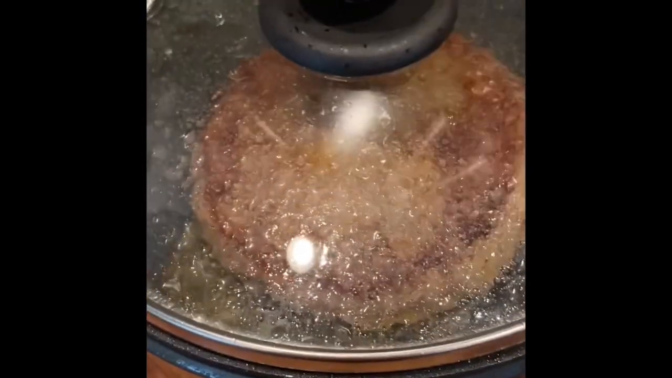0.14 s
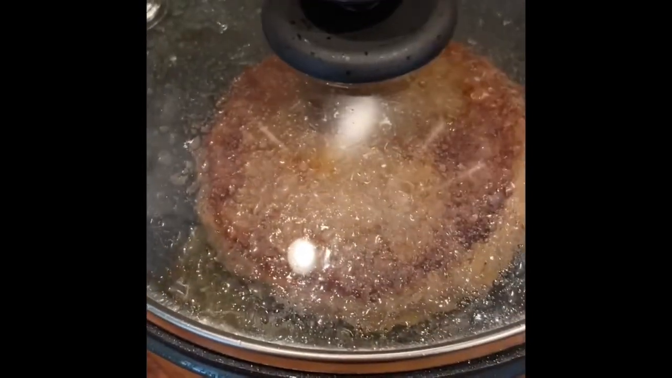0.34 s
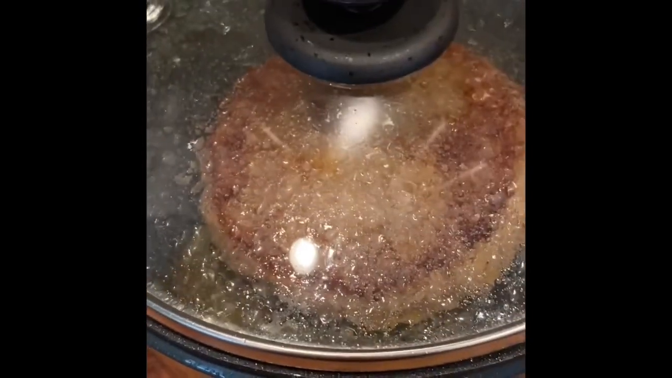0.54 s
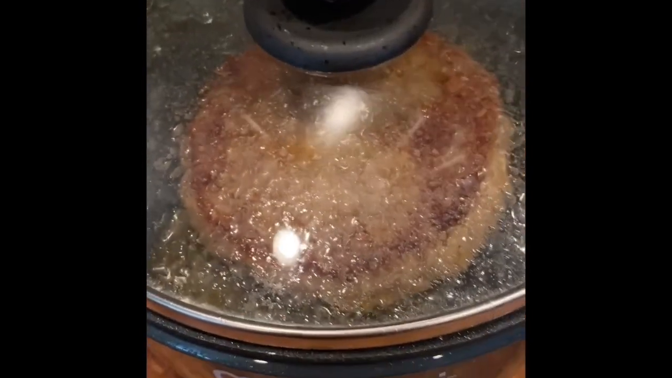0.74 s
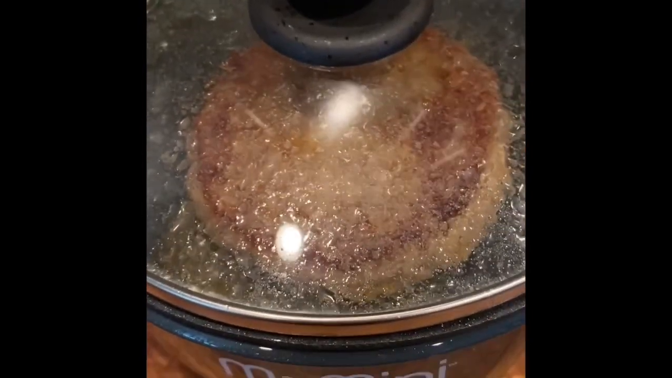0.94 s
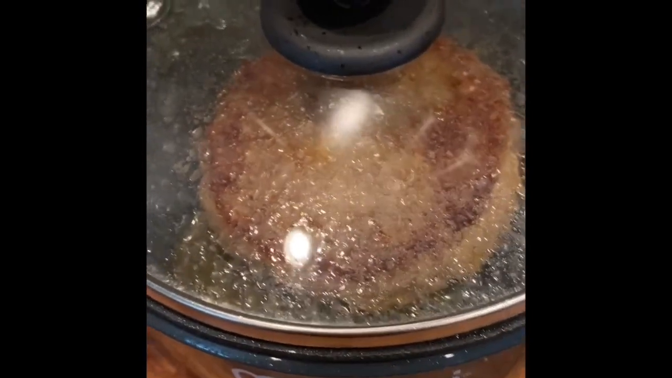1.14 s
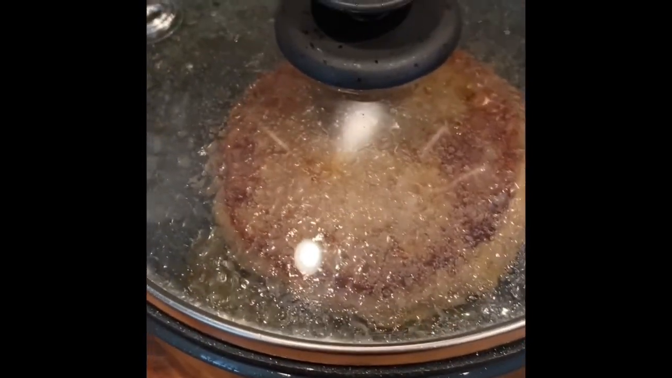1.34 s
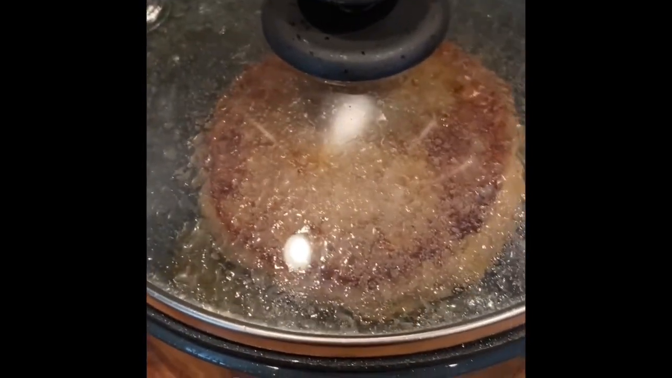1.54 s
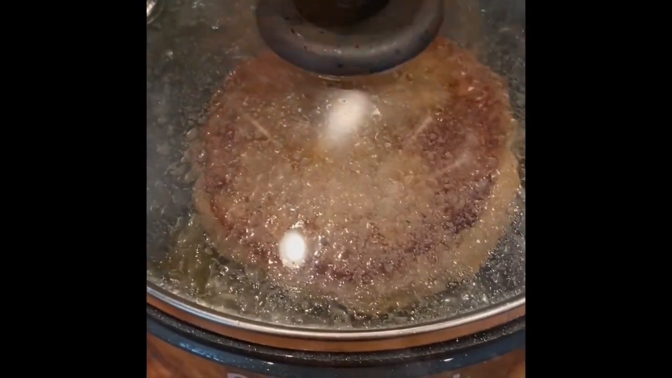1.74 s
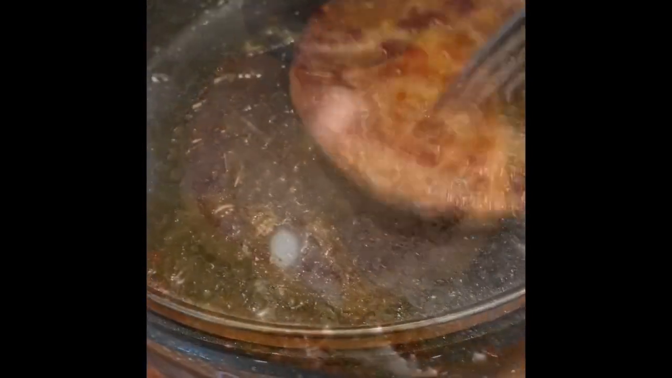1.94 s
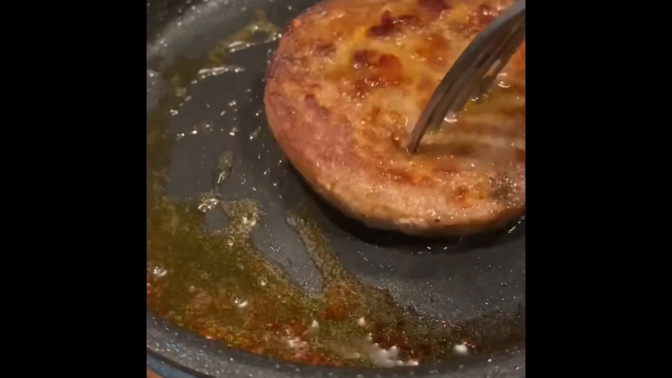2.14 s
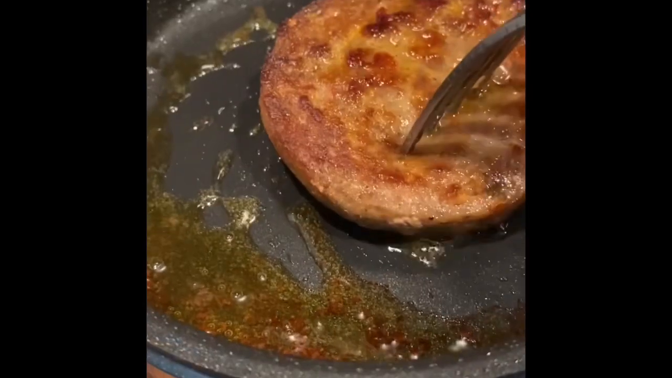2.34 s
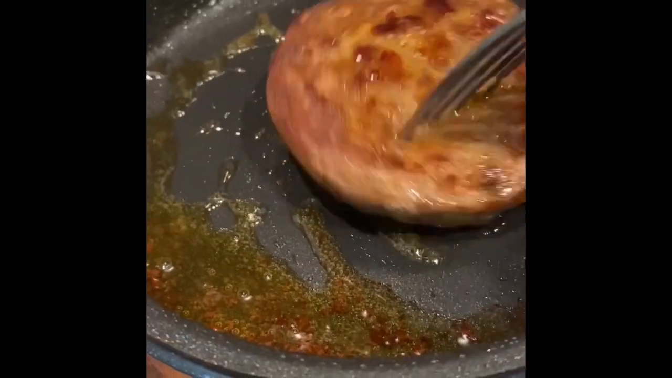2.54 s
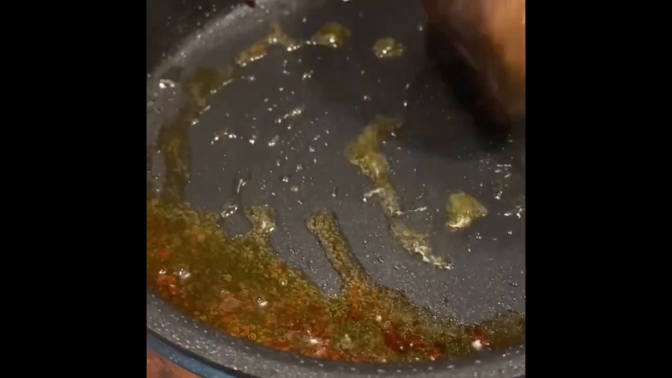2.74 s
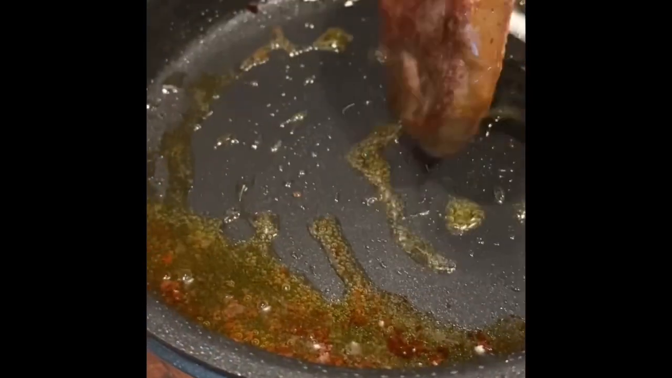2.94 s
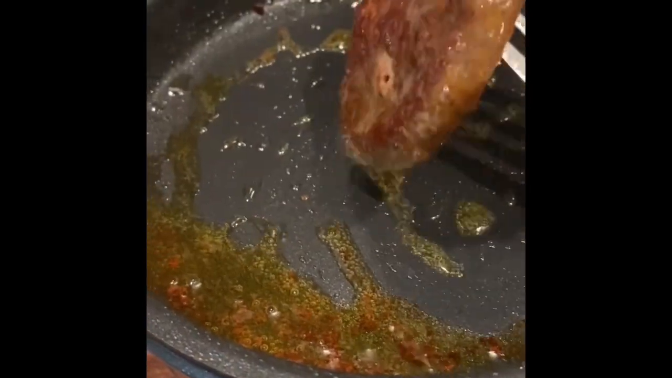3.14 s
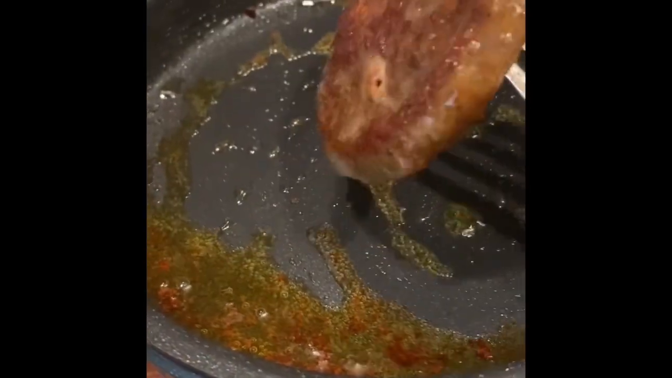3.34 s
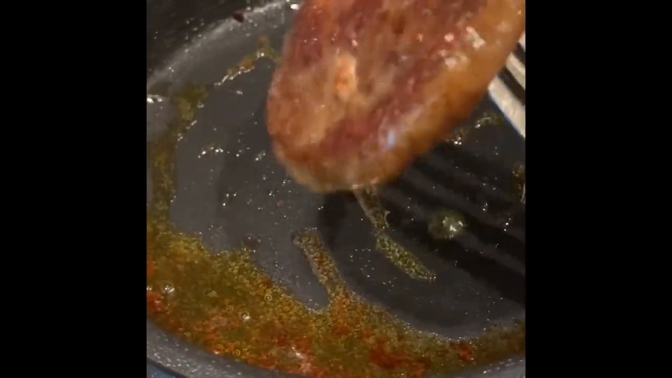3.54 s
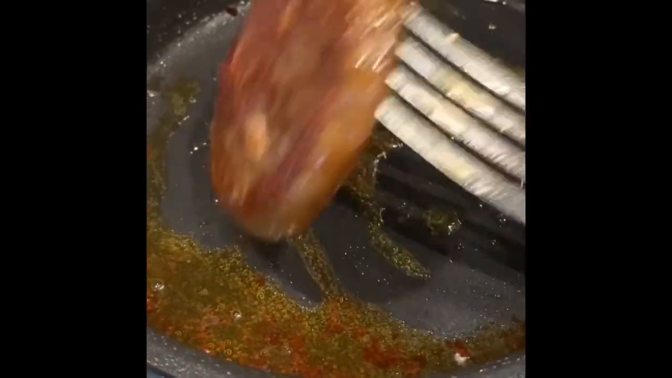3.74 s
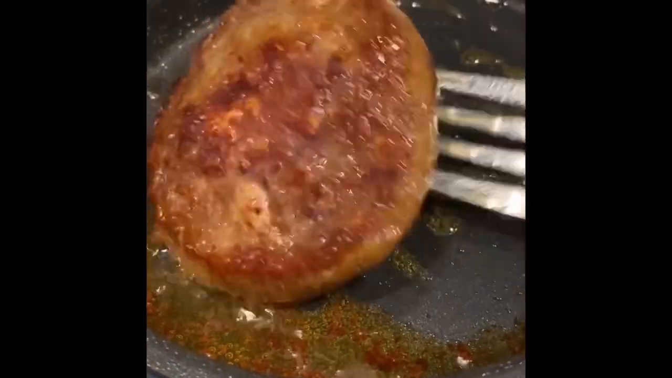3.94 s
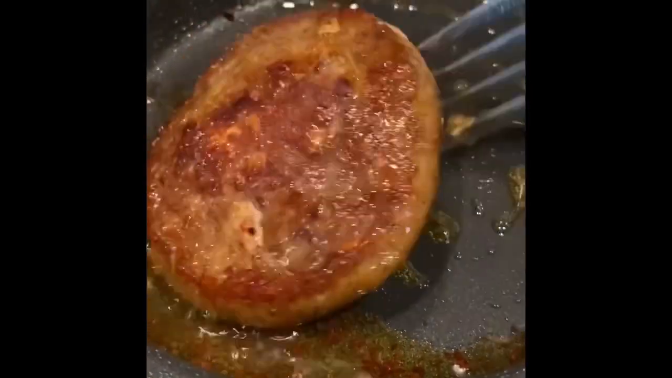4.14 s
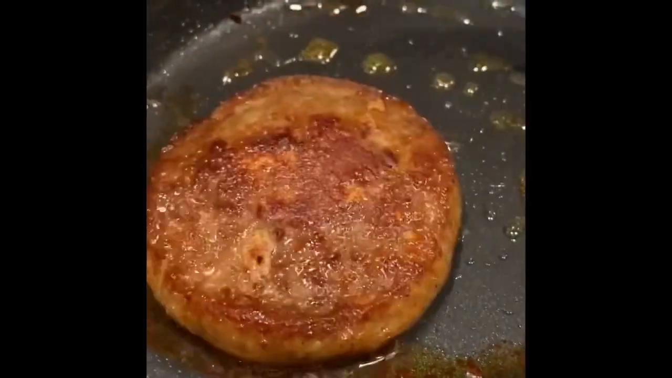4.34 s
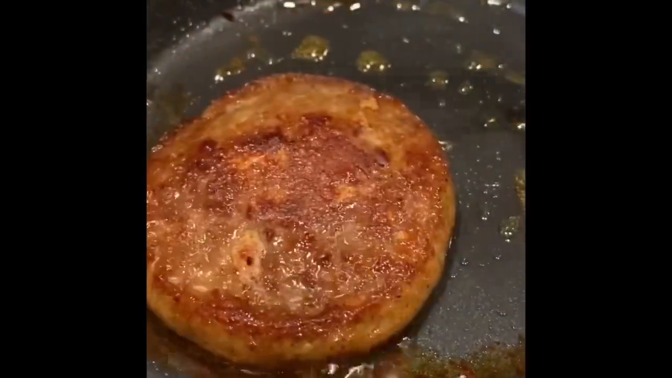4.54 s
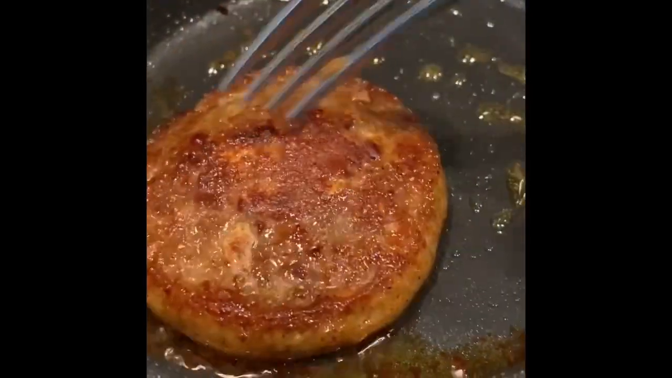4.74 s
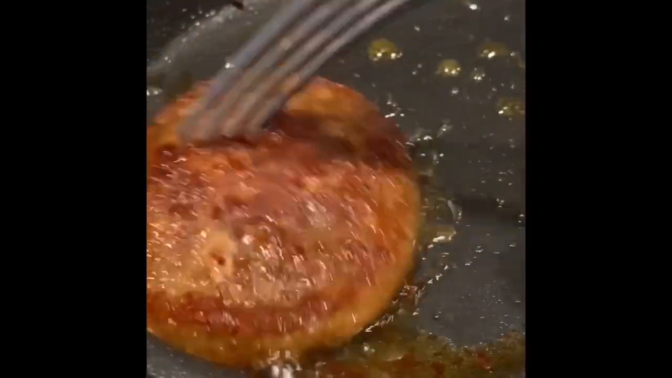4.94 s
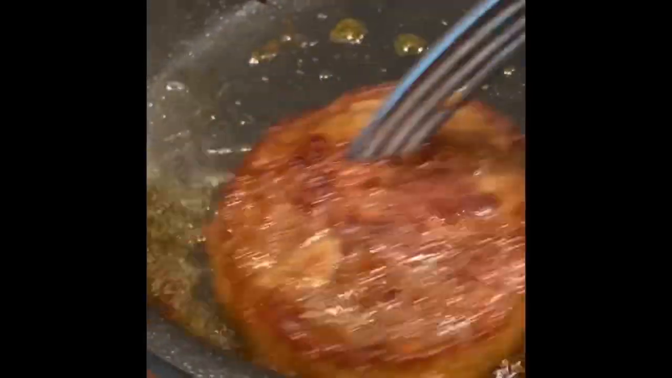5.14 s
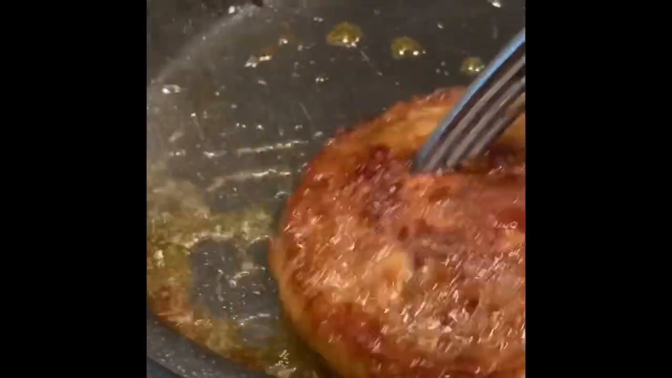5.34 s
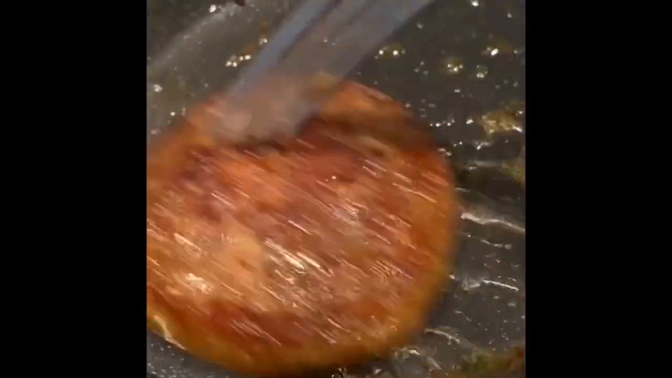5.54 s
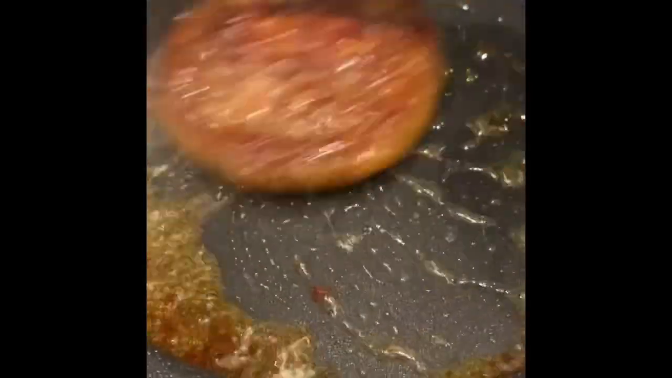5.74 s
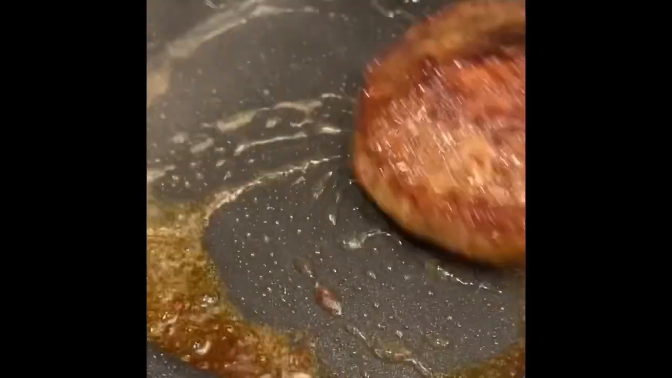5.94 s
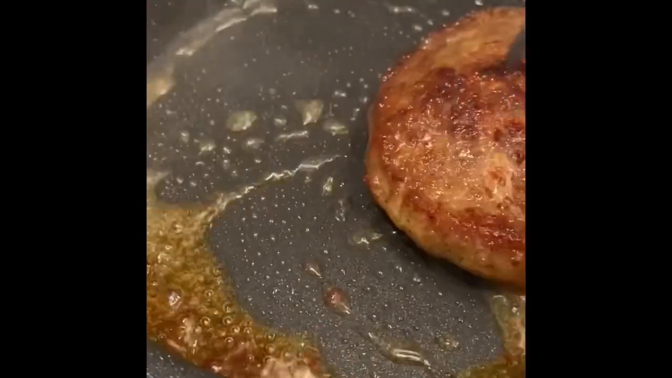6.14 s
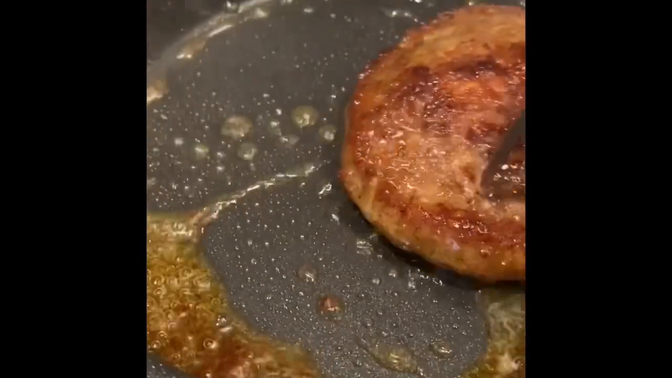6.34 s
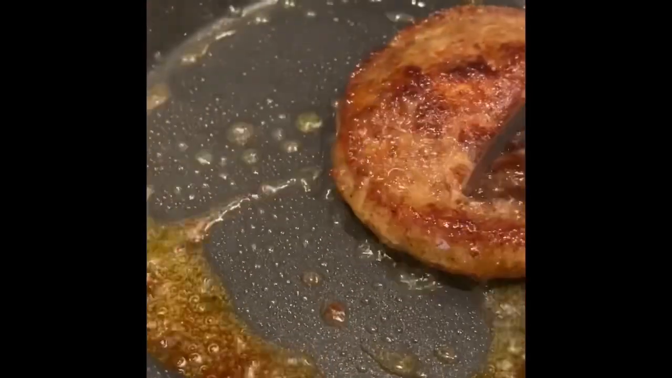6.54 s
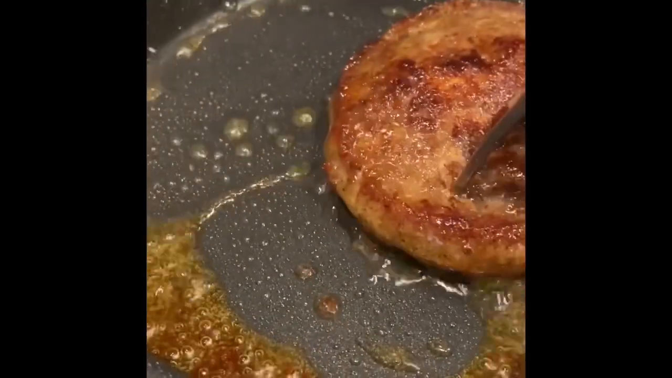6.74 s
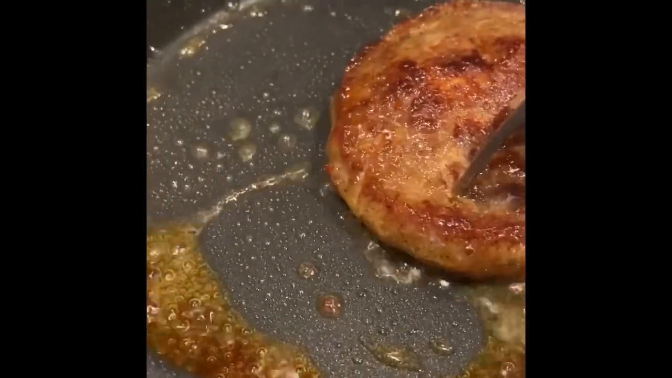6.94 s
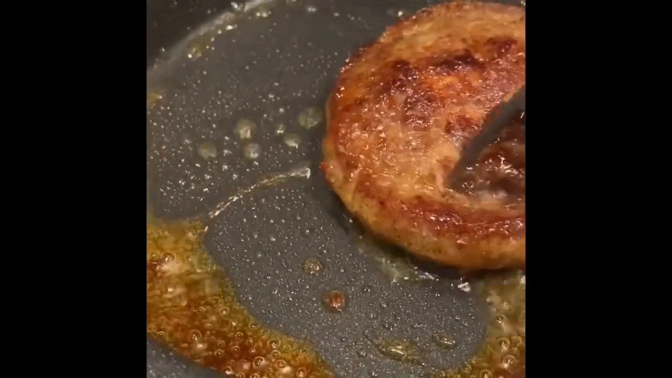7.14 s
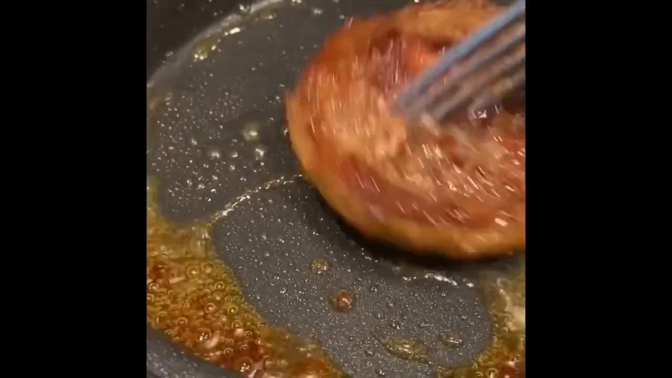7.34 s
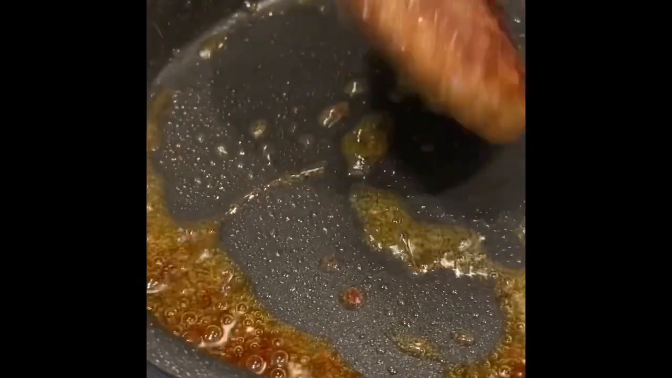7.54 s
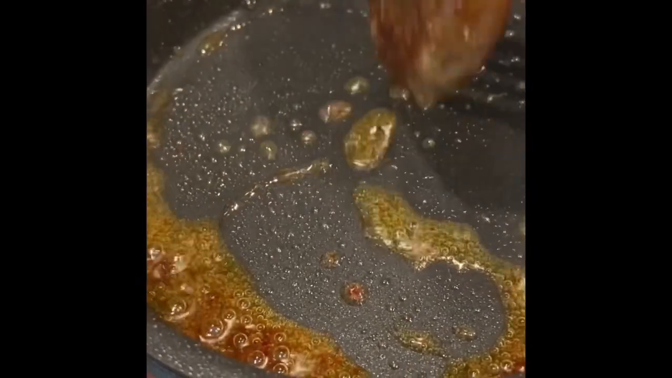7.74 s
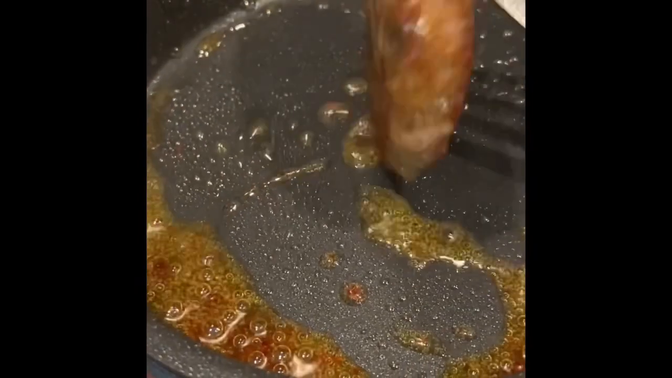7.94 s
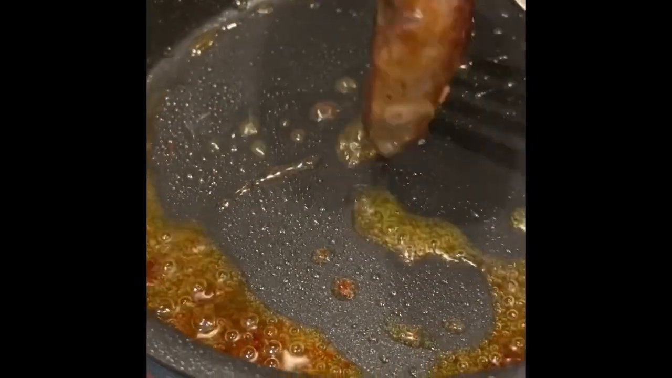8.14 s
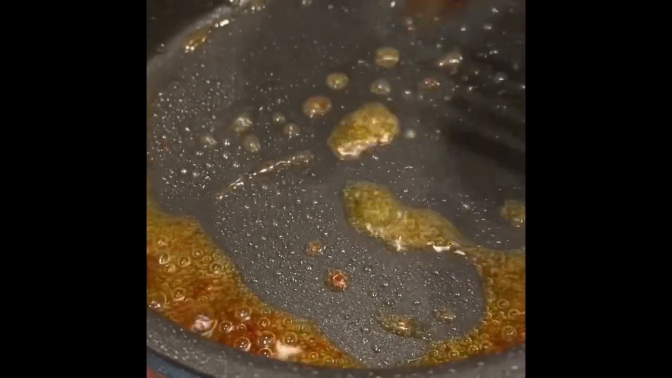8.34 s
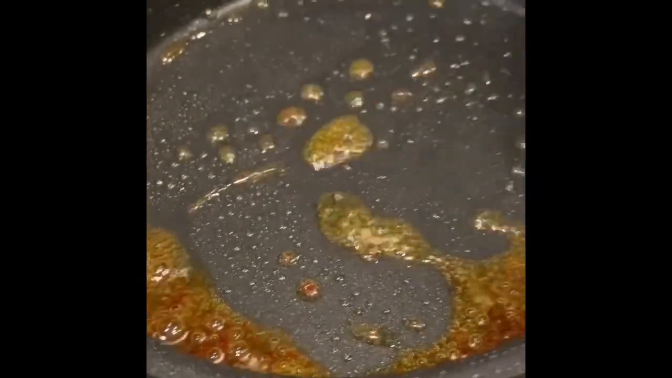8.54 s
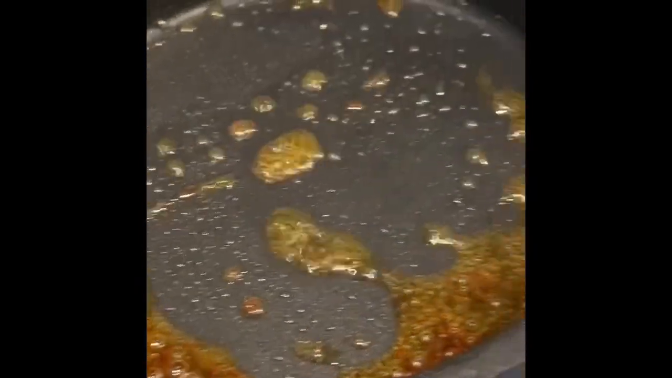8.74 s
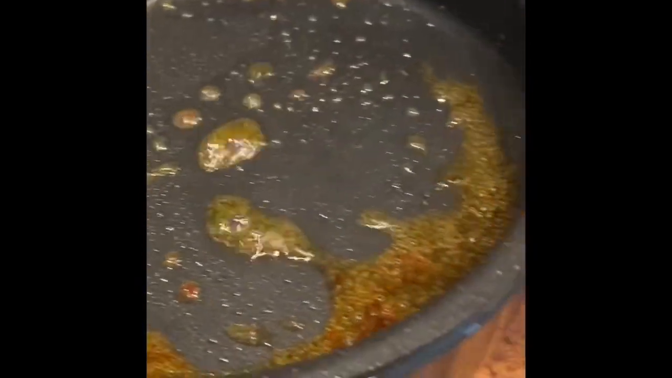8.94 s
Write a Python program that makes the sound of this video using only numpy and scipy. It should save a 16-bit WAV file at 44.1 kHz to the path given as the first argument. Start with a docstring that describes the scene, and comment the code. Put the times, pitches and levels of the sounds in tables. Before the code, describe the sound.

Hot fat simmers with a thin, enclosed ring under a lid, with a few small ticks. Uncovered, it becomes crisp, wide and spitting. Metal tines clack and briefly chatter on the pan as the patty is flipped, followed by dense hissing swells that fade to separate snaps. Close stereo microphone, short indoor room, faint mains hum and dull air noise.

```python
"""A meat patty sizzles in a small electric skillet, heard from close above: steam bursts as fizz and crackle.
Larger bubbles pop: each snaps, rings its cavity and throws a spray of noise.
A glass lid makes the sizzle faint and hollow with its ringing air, then lifts away.
A fork knocks and scrapes the pan as it drags and flips the patty; the sizzle swells and slowly calms.
Behind it lie mains hum, a faint whine, a low drone and dull room noise."""
import sys
import numpy as np
from scipy import signal
from scipy.fft import rfft, irfft, next_fast_len
from scipy.io import wavfile
from scipy.ndimage import map_coordinates

SR = 44100
rng = np.random.default_rng(int(sys.argv[2]) if len(sys.argv) > 2 else 0)


def generate_wav(signal):
    """Clip the signal to [-1, 1] and save it as 16-bit WAV at the path in sys.argv[1]."""
    frames = np.transpose(np.atleast_2d(signal))
    scaled = np.clip(frames, -1, 1) * 32767
    pcm = np.round(scaled).astype(np.int16)
    wavfile.write(sys.argv[1], SR, pcm)


N = 401310  # length in samples


def amp(db):
    """Decibels to gain."""
    return 10 ** (np.asarray(db) / 20)


def unit(x):
    """Scale to rms 1."""
    return x / np.sqrt(np.mean(x ** 2) + 1e-20)


def unit_rows(x):
    """Scale each row to energy 1."""
    return x / np.linalg.norm(x, axis=1, keepdims=True)


def along(points, hz):
    """Read a curve of (pitch_hz, value) points on a log pitch axis."""
    f, v = np.transpose(points)
    return np.interp(np.log(hz + 1), np.log(f + 1), v)


def curves(rows):
    """One value per sample for each column after the time."""
    s, *cols = np.transpose(rows)
    return [np.interp(np.arange(N) / SR, s, c) for c in cols]


def wobble(rate):
    """A smooth random curve with this many knots a second."""
    knots = rng.standard_normal(int(N * rate / SR) + 4)
    return map_coordinates(knots, [np.arange(N) * rate / SR])


def filtered(x, response):
    """Multiply the spectrum of x by a response that depends on frequency."""
    m = next_fast_len(N + SR // 2)
    return irfft(rfft(x, m) * response(np.fft.rfftfreq(m, 1 / SR)), m)[..., :N]


def coloured(x, spectrum):
    """Shape x with a (pitch_hz, level_db) curve, at rms 1."""
    return unit(filtered(x, lambda hz: amp(along(spectrum, hz))))


def resonances(modes, f):
    """Response at the frequencies f of (pitch_hz, width_hz, level_db) resonances."""
    return sum(amp(db) * 1j * f * w / (c * c - f * f + 1j * f * w) for c, w, db in modes)


def placed(times, waves):
    """Sum short waves (one a row) at their times."""
    at = np.round(np.asarray(times) * SR).astype(int)[:, None] + np.arange(waves.shape[1])
    return np.bincount(np.clip(at, 0, N).ravel(), waves.ravel(), N + 1)[:N]


def bursts(rate, spread_db):
    """Random impulses of both signs and uneven size, this many a second on average, at rms 1."""
    size = amp(spread_db * np.minimum(rng.standard_normal(N), 1.5))
    happens = rng.random(N) < rate / SR
    return unit(happens * size * rng.choice([-1, 1], N))


def rings(hz, cycles, size=256):
    """Short rings of unit energy, one a row: each swells and dies within a few cycles."""
    turns = np.asarray(hz)[:, None] * np.arange(size) / SR
    age = turns / np.reshape(cycles, (-1, 1))
    return unit_rows(age * np.exp(-age) * np.sin(2 * np.pi * turns))


def swell(start, rise, hold, fall_db_per_s):
    """Gain that rises, holds and dies away."""
    age = np.arange(N) / SR - start
    return np.clip(age / rise, 0, 1) * amp(-fall_db_per_s * np.maximum(age - rise - hold, 0))


# the lid lifts: start_s, open_share (0-1 of the pan)
LID_OPENING = [(1.73, 0.28), (1.8, 0.43), (1.97, 1.0)]


def open_share():
    """Share of the pan that the lid leaves open, at every sample."""
    return curves(LID_OPENING)[0]


def shut_gain():
    """Gain of what is heard through the lid: it fades as the lid opens."""
    return np.sqrt(np.clip(1 - open_share(), 0, 1))


# mains hum over time: start_s, base_level_db (rms), octave_level_db (rms)
HUM_LEVELS = [(0, -70, -56.5), (1.6, -66, -57), (1.97, -62, -63), (2.3, -59, -55), (4.0, -53.5, -56),
              (4.9, -57, -57.5), (5.9, -59.5, -62.5), (7.3, -65.5, -63.5), (8.4, -68, -60)]
HUM_HZ = 59.8
# faint steady appliance whine: pitch_hz, level_db (rms)
WHINE_TONES = [(242.2, -75), (355.3, -71.5), (387.6, -72)]
DRONE_HZ, DRONE_DB = 71.3, -63  # low tone, rms dB with the lid shut; it fades as the lid lifts


def appliance_tones():
    """Mains hum with its octave, a low drone and a whine: plain tones that drift slightly."""
    t = np.arange(N) / SR
    base_db, octave_db = curves(HUM_LEVELS)
    phase = 2 * np.pi * np.cumsum(HUM_HZ + .15 * wobble(1.98)) / SR
    hum = amp(base_db) * np.sin(phase) + amp(octave_db) * np.sin(2 * phase)
    whine = sum(amp(db) * np.sin(2 * np.pi * hz * t + wobble(5)) for hz, db in WHINE_TONES)
    drone = amp(DRONE_DB) * shut_gain() * np.sin(2 * np.pi * DRONE_HZ * t + .5 * wobble(3))
    return np.sqrt(2) * (hum + whine + drone)  # peak level from rms level


# colour of the low room rumble: pitch_hz, relative_level_db
RUMBLE_COLOUR = [(20, -42), (36, -11), (50, 9), (72, 10), (95, 4), (140, -39)]
# colour of the dull kitchen air: pitch_hz, relative_level_db
AIR_COLOUR = [(60, -15), (130, -3), (180, -2.5), (300, -3), (400, -7.5), (600, -13.5), (1000, -18),
              (1300, -14.5), (5000, -52)]
RUMBLE_DB, AIR_DB = -68.5, -61.5  # levels at the average hum
RUMBLE_SWELLS, AIR_SWELLS = 1.2, 0.74  # dB by which each swells per dB of hum
AIR_SIDE_DB = -16  # sideways part of the air, against its centre


def room_noise():
    """Soft noise, low and dull, that swells and sinks together with the hum."""
    base_db, octave_db = curves(HUM_LEVELS)
    hum_db = 20 * np.log10(np.hypot(amp(base_db), amp(octave_db)))
    swing_db = hum_db - hum_db.mean()
    rumble = amp(RUMBLE_DB) * coloured(rng.standard_normal(N), RUMBLE_COLOUR)
    # both rows share one rms
    centre, sides = amp(AIR_DB) * coloured(rng.standard_normal((2, N)), AIR_COLOUR)
    air = centre + amp(AIR_SIDE_DB) * np.array([sides, -sides])
    return amp(RUMBLE_SWELLS * swing_db) * rumble + amp(AIR_SWELLS * swing_db) * air


# how long the room rings: pitch_hz, t60_s (time to fall 60 dB)
ROOM_DECAY = [(150, 0.11), (1500, 0.084), (6000, 0.09), (15000, 0.023)]


def room(x):
    """Two short tails of fading noise: one from ahead, one from the sides."""
    hz, t, z = signal.stft(rng.standard_normal((2, SR // 3)), SR, nperseg=256)
    fade = amp(-60 * t / along(ROOM_DECAY, hz)[:, None])
    tail = signal.istft(z * fade, SR, nperseg=256)[1]
    return signal.fftconvolve(x[None], tail / np.linalg.norm(tail[0]), axes=1)[:, :N]


def smeared(x, life):
    """Smear x with four brief fading noises whose mix keeps shifting, so it loosens from the plain sound."""
    t = np.arange(SR // 50) / SR
    smears = unit_rows(rng.standard_normal((4, len(t))) * np.exp(-t / life) * (t > .0005))
    copies = signal.fftconvolve(x[None], smears, axes=1)[:, :N]
    weights = np.array([wobble(60) for _ in copies])
    return np.sum(copies * weights, axis=0) / np.linalg.norm(weights, axis=0)


def struck(modes, t):
    """One blow rings (pitch_hz, level_db, t60_s) modes at slightly random strengths, with peak 1 or less."""
    ring = 0
    for hz, db, t60 in modes:
        fading = amp(db + rng.normal(0, 1) - 60 * t / t60)
        ring = ring + fading * np.sin(2 * np.pi * (hz * t + rng.random()))
    return ring * (1 - np.exp(-t / 0.00029)) / np.abs(ring).max()


# fork and patty knock the pan: start_s, pan_ring_db, clack_db (before CLACK_GAIN_DB), crack_db, thud_db,
# pitch_ratio (at that spot; a higher one also shortens the ring)
KNOCK_TIMES = [(2.945, -23, -40, -43, -62, 1.02), (2.99, -33, -57, -62, -65, 1.02),
               (3.033, -40, -64, -68, -70, 1.03), (3.747, -34, -30, -23, -40, 1.0),
               (3.7505, -31, -35, -25, -55, 1), (3.8205, -33, -34, -22, -42, 0.91),
               (4.238, -31.5, -41, -38, -52, 1.0), (4.247, -55, -52, -50, -31, 1.0),
               (8.225, -53, -59, -55, -43, 0.97)]
# tones of the struck pan: pitch_hz, relative_level_db, t60_s (at pitch ratio 1)
PAN_TONES = [(390, -23, 0.12), (630, 0.5, 0.046), (755, 3, 0.07), (910, -7, 0.034), (990, -6, 0.041),
             (1155, -5.5, 0.027), (1340, -9, 0.038), (1570, -25, .05), (2090, -8, 0.06), (2326, -11, 0.04)]
# tones of the fork against the pan: pitch_hz, relative_level_db, t60_s (at pitch ratio 1)
TINE_TONES = [(412, -8, 0.1), (720, -6, 0.05), (1320, -4, 0.024), (1630, -1, 0.026), (2150, -1, 0.024),
              (2360, -6, .018), (2690, -1, 0.018)]
# colour of the crunching crust: pitch_hz, relative_level_db
CRACK_COLOUR = [(150, -22), (400, -7), (700, 0), (1000, -5), (1500, 0), (2200, 0), (3000, -7), (5000, -7),
                (9000, -17), (16000, -30)]
CLACK_GAIN_DB = 5.0
CRACK_T60_S, THUD_T60_S, THUD_HZ = 0.023, 0.095, 85


def knocks():
    """Each knock rings the pan, with a clack from the tines, a crunch from the crust and a thud from the meat."""
    t = np.arange(SR // 4) / SR
    s, ring_db, clack_db, crack_db, thud_db, pitch = np.transpose(KNOCK_TIMES)
    blows = []
    for pan_db, tine_db, p in zip(ring_db, clack_db + CLACK_GAIN_DB, pitch):
        blows.append(amp(pan_db) * struck(PAN_TONES, p * t) + amp(tine_db) * struck(TINE_TONES, p * t))
    blows = np.array(blows)
    grit = coloured(rng.standard_normal(N), CRACK_COLOUR)[:blows.size].reshape(blows.shape)
    cracks = amp(crack_db)[:, None] * grit * amp(-60 * t / CRACK_T60_S)
    thud = np.sin(2 * np.pi * THUD_HZ * t) * amp(-60 * t / THUD_T60_S) * (1 - np.exp(-t / .004))
    return placed(s, blows + cracks + amp(thud_db)[:, None] * thud)


# the fork chatters over the pan floor: start_s, hold_s, floor_ring_db, tine_ring_db, pitch_ratio
SCRAPE_STROKES = [(2.941, .004, -44, -36, .98), (2.959, 0.031, -43, -46, 1.02), (3.904, .008, -54, -39, 1),
                  (3.917, .01, -43, -48, 1.01), (3.97, 0.011, -44, -46, 1.02),
                  (3.989, .028, -37, -38.5, 1.04), (4.028, 0.018, -41, -43, .97),
                  (4.053, .011, -36, -36, 1), (4.062, 0.0054, -29, -42, 0.99)]
# what the rubbed pan floor rings: pitch_hz, width_hz, relative_level_db (all before squaring)
FLOOR_RINGS = [(400, 35, -7.5), (636, 55, 0), (757, 45, .8)]
# what the rubbed tines ring: pitch_hz, width_hz, relative_level_db (all before squaring)
TINE_RINGS = [(1015, 110, 1), (1147, 110, -2), (1360, 90, -9)]
SCRAPE_RISE_S, SCRAPE_FALL_DB_PER_S = 0.0045, 1100
SLIPS_PER_S, RUB_DB = 650, -5  # catches of the tines; smooth rubbing between them, against the slips
GRIP_DB, GRIP_PER_S = 1, 130  # uneven grip: size and knots a second
SCRAPE_WANDER = 0.02004  # how far the pitch ratio strays


def scrapes():
    """The sliding fork sticks and slips; slips ring floor and tines at a pitch that moves with the contact."""
    start, hold, floor_db, tine_db, pitch = np.transpose(SCRAPE_STROKES)
    slips = bursts(rate=SLIPS_PER_S, spread_db=3.0) + amp(RUB_DB) * rng.standard_normal(N)
    ratio = curves(np.column_stack([start, pitch]))[0] + SCRAPE_WANDER * wobble(40)
    slide = np.cumsum(ratio)  # reading faster raises the pitch
    strokes = np.array([swell(s, SCRAPE_RISE_S, h, SCRAPE_FALL_DB_PER_S) for s, h in zip(start, hold)])

    def rubbed(modes):
        ring = unit(filtered(slips, lambda f: resonances(modes, f) ** 2))
        return map_coordinates(ring, [slide])

    floor = amp(floor_db) @ strokes * rubbed(FLOOR_RINGS)
    tines = amp(tine_db) @ strokes * rubbed(TINE_RINGS)
    return amp(GRIP_DB * wobble(GRIP_PER_S)) * (floor + tines)


# the trapped air rings higher as it fills with steam: start_s, pitch_ratio
STEAM_PITCH = [(0, 0.972), (.4, 0.986), (.85, 1.012), (1.8, 1.03)]
# the air under the lid rings: pitch_hz, width_hz, relative_level_db (pitch and width before the steam shift)
LID_AIR_RINGS = [(552, 36, 6.5), (870, 210, 3.6), (1400, 120, -3), (2010, 180, 2.6), (3310, 280, 1),
                 (4880, 185, 3), (6080, 260, 2.5), (8600, 310, -7), (8900, 960, -4), (11200, 1500, -8)]
# colour of the sizzle that leaks past the lid: pitch_hz, relative_level_db
LEAK_COLOUR = [(300, -22), (1600, -15), (2700, 2), (4200, -5), (5500, -9), (7000, -39), (10000, -1),
               (13000, 8), (16000, 3)]


def covered():
    """Under the lid the sizzle is faint and hollow, coloured by the trapped air."""
    boiling = bursts(rate=5000, spread_db=6.0) + amp(-7.5) * bursts(rate=120, spread_db=9.0)
    hollow = unit(filtered(boiling, lambda f: resonances(LID_AIR_RINGS, f)))
    hollow = amp(-51.5) * map_coordinates(hollow, [np.cumsum(curves(STEAM_PITCH)[0])])
    leaking = bursts(rate=6600, spread_db=5.0) + amp(-10) * bursts(rate=150, spread_db=9)
    leak = amp(-53.0) * coloured(leaking, LEAK_COLOUR)
    return shut_gain() * amp(0.41 * wobble(13.1)) * (hollow + leak)


# the loudest bursting bubbles: start_s, pitch_hz (of the cavity), ring_db, snap_db, spray_db
# (levels before the three gains of pops)
LOUD_POPS = [(.106, 5940, -58, -59, -44), (.343, 4800, -54, -60, -57), (.451, 4840, -52, -63, -61),
             (.468, 4830, -44, -59, -52), (.557, 4870, -46.5, -62, -46), (.603, 3500, -52, -47, -44),
             (.672, 6000, -51, -62, -55), (.762, 3470, -54, -52, -52), (.816, 3420, -53, -49, -52),
             (1.144, 5000, -59, -51, -41), (1.163, 6220, -47, -60, -56), (1.173, 4910, -47, -57, -55.5),
             (1.188, 4970, -49, -56, -55), (1.337, 4890, -54, -54, -56), (1.351, 5320, -52, -54, -54),
             (1.866, 5210, -41, -47, -40), (1.891, 4990, -35, -44, -49), (1.935, 5000, -42, -48, -32),
             (1.981, 4090, -44, -47, -35), (2.105, 3960, -38, -41, -32), (2.12, 5400, -42, -46, -28),
             (2.144, 5200, -39, -44, -32), (2.177, 5320, -31, -41, -29), (2.211, 5660, -29, -32.5, -24),
             (2.236, 5260, -28, -40, -32), (2.259, 6060, -32, -45, -24), (2.295, 5230, -30, -41, -34),
             (2.321, 5210, -27, -33, -30), (2.394, 6200, -29, -45, -32), (2.464, 6310, -33, -41, -35),
             (2.493, 5230, -32, -44, -41), (2.511, 5470, -37, -47, -26.5), (2.551, 4110, -48, -34, -26),
             (2.585, 5120, -33, -42, -22), (2.601, 4870, -37, -42, -32), (2.633, 5530, -34, -49, -23),
             (2.655, 6120, -35, -49, -26), (2.695, 5540, -27.5, -55, -39), (2.794, 4800, -39, -43, -32),
             (2.824, 5640, -44, -43, -31), (2.866, 4300, -35, -33, -26), (2.906, 6160, -40, -48, -33),
             (2.924, 6900, -26, -40, -30), (2.944, 4780, -39, -36, -29), (2.973, 5460, -41, -36, -26.5),
             (3.018, 4950, -36, -35, -37), (3.024, 5040, -33, -54, -45), (3.06, 4480, -38, -41, -34),
             (3.072, 4200, -30, -47, -45), (3.091, 5630, -33, -33.5, -39), (3.157, 5000, -28, -32, -38),
             (3.162, 5470, -26, -44, -38), (3.169, 5370, -26, -48, -40), (3.182, 5560, -29.5, -42, -35),
             (3.221, 6240, -34, -43, -27), (3.229, 5100, -25, -38, -29), (3.313, 5040, -36, -43, -32),
             (3.326, 5040, -40, -46, -31), (3.339, 5000, -32.5, -45, -35), (3.356, 5340, -39, -45, -31),
             (3.405, 6120, -36, -47, -37), (3.436, 5250, -35.5, -48, -35), (3.463, 5860, -41, -34, -27),
             (3.489, 4760, -41, -31.5, -31.5), (3.551, 2900, -40, -32, -48), (3.597, 5290, -35, -32.5, -35),
             (3.603, 4610, -33, -38, -32), (3.612, 5700, -30, -32, -25), (3.63, 4400, -32, -30, -27),
             (3.645, 4600, -33, -48, -33), (3.665, 4890, -37, -35, -34), (3.714, 5550, -31, -41, -35),
             (3.732, 2700, -37, -32, -21), (3.784, 3350, -33, -44, -38), (3.845, 4280, -27, -37, -34),
             (3.88, 6410, -41, -55, -29.5), (3.946, 5340, -30, -46, -27), (3.962, 6310, -33, -42, -37),
             (4.045, 4700, -39, -31, -27), (4.11, 5120, -36, -38, -41), (4.115, 5200, -25.5, -47, -29),
             (4.132, 5210, -36, -31, -24.5), (4.159, 5060, -38, -33, -33), (4.213, 5370, -37, -28, -26.5),
             (4.238, 5080, -29, -42, -26), (4.248, 2990, -24, -47, -40), (4.271, 5870, -30, -45, -25),
             (4.286, 5340, -36, -40, -25), (4.328, 4780, -27, -44, -22.5), (4.331, 4240, -27, -38, -34),
             (4.377, 6360, -25, -34, -25), (4.393, 3830, -28, -40, -28), (4.406, 3250, -26, -30, -32),
             (4.439, 5200, -24, -45, -38), (4.548, 4750, -26, -29, -34), (4.58, 5040, -29, -33.5, -38),
             (4.589, 6360, -25, -27.5, -28), (4.602, 5230, -24, -40, -34), (4.663, 5500, -21.5, -26, -31),
             (4.668, 4780, -25.5, -26, -33), (4.77, 5990, -32, -26, -38), (4.799, 5170, -31, -30, -38),
             (4.955, 5210, -22, -37, -24), (4.962, 6400, -19, -40, -24), (4.967, 3400, -21.5, -34, -28),
             (4.971, 4570, -21, -34, -27), (5.228, 4870, -26, -26, -31), (5.248, 5060, -24, -28, -30),
             (5.462, 4870, -23, -32, -30), (6.112, 5170, -29, -34, -33), (6.734, 5400, -32, -33, -36),
             (7.153, 5580, -34, -36, -34), (7.55, 6290, -33.5, -57, -40), (7.894, 4400, -42, -39.5, -29),
             (7.997, 6030, -42, -50, -31), (8.038, 5300, -43.5, -44, -29), (8.107, 5300, -46, -54, -27),
             (8.148, 5450, -37, -50, -37), (8.216, 5000, -39.5, -40, -29.5), (8.281, 6050, -31, -43, -34),
             (8.311, 5320, -35, -47, -42), (8.356, 4570, -30.5, -47, -33), (8.359, 3200, -37, -50, -44),
             (8.416, 4880, -31.5, -50, -41), (8.497, 6500, -39, -32.5, -28.5),
             (8.55, 6370, -33, -52, -30.5), (8.597, 5300, -32, -43, -34), (8.613, 5320, -35.5, -53, -45),
             (8.643, 4870, -38.5, -48, -30), (8.658, 5860, -33.5, -52, -39), (8.7, 5120, -34, -44, -30),
             (8.707, 4670, -37, -53, -43), (8.72, 5380, -31, -48, -36), (8.751, 6350, -26, -50, -39),
             (8.788, 5990, -33, -43, -34), (8.805, 6050, -33.5, -48, -38), (8.842, 5470, -32.5, -55, -36),
             (8.87, 4870, -33, -57, -44), (8.887, 5080, -40, -40, -36), (8.893, 3000, -40, -33, -26),
             (8.928, 6200, -26, -42, -37), (8.992, 5510, -32.5, -52, -40), (9.002, 5430, -35, -55, -41),
             (9.009, 5340, -35, -55, -42), (9.03, 5300, -28, -44, -40), (9.033, 5330, -22.5, -55, -41.5)]
CHAIN_S, CHAIN_DB = .013, -12.5  # a pop sets off a neighbour: typical delay, level against its parent
SMALL_HZ, SMALL_SCATTER, SMALL_SPREAD_DB = 5900, .09, 3  # small pops: typical pitch, spread of log pitch, of level
STRAY_RING_DB, STRAY_SNAP_DB, STRAY_SPRAY_DB = -44, -50, -35.5  # typical, before the three gains of pops


def neighbours(count):
    """In the opening pan each loud pop sets off weaker ones just after it; columns as in LOUD_POPS."""
    parents = np.repeat([row for row in LOUD_POPS if row[0] > LID_OPENING[0][0]], count, axis=0)
    chance = np.clip(rng.standard_normal((len(parents), 5)), -2, 2)
    start = parents[:, 0] + CHAIN_S * np.exp(chance[:, 0] / 2)
    pitch = SMALL_HZ * np.exp(SMALL_SCATTER * chance[:, 1])
    levels_db = parents[:, 2:] + CHAIN_DB + SMALL_SPREAD_DB * chance[:, 2:]
    return np.column_stack([start, pitch, levels_db])


def strays(count):
    """Small pops at random moments once the lid is off; columns as in LOUD_POPS."""
    chance = np.clip(rng.standard_normal((count, 4)), -2, 2)
    start = rng.uniform(LID_OPENING[-1][0], N / SR, count)
    pitch = SMALL_HZ * np.exp(SMALL_SCATTER * chance[:, 0])
    levels_db = np.array([STRAY_RING_DB, STRAY_SNAP_DB, STRAY_SPRAY_DB]) + SMALL_SPREAD_DB * chance[:, 1:]
    return np.column_stack([start, pitch, levels_db])


RING_GAIN_DB, SNAP_GAIN_DB, SPRAY_GAIN_DB = 23, 24, 26.5


def pops():
    """A big bubble snaps open, rings its cavity and throws a fine spray."""
    s, hz, ring_db, snap_db, spray_db = np.vstack([LOUD_POPS, neighbours(count=1), strays(count=120)]).T
    chance = rng.standard_normal((len(s), 513))
    shut = 1 - np.interp(s, *np.transpose(LID_OPENING))
    # a bubble that opens gently, with little spray, rings longer; so does one under the lid
    cycles = np.clip(1.12 * amp(0.31 * (ring_db - spray_db)), .7, 3) + .4 + 4 * shut
    ring = rings(hz, cycles, size=512) * amp(ring_db + RING_GAIN_DB)[:, None]
    snap_hz = 2100 * np.exp(0.23 * chance[:, 0])
    snap = rings(snap_hz, 0.32, size=512) * amp(snap_db + SNAP_GAIN_DB)[:, None]
    spray = unit_rows(chance[:, 1:] * np.exp(-np.arange(512) / SR / 0.0009))
    spray = spray * amp(spray_db + SPRAY_GAIN_DB - 3.0 * shut)[:, None]

    def above(x, edge_hz):
        return filtered(x, lambda f: (1j * f / (1j * f + edge_hz)) ** 2)

    return placed(s, ring) + above(placed(s, snap), edge_hz=1730) + above(placed(s, spray), edge_hz=3130)


# the sizzle swells and dies away, as the lid lifts, the meat lands or the oil film fizzes:
# start_s, fizz_db, sear_db, sputter_db (low), hold_s, fall_db_per_s (of the fizz)
SIZZLE_SWELLS = [(1.71, -38, -47, -62.5, .33, 12), (2.11, -25.5, -35.5, -50.5, 0.076, 33),
                 (2.397, -32.5, -45.5, -56.5, 0.033, 44), (2.71, -36.5, -46, -61.5, 0.21, 14),
                 (3.83, -38, -42.5, -51.5, .13, 22), (4.18, -34.5, -36.5, -52, 0.048, 19),
                 (4.274, -46, -34, -47, 0.07, 50), (4.495, -33.5, -34.5, -45, 0.16, 16),
                 (4.743, -31.5, -34, -46.5, 0.16, 31), (4.857, -22.5, -28.5, -46.5, 0.51, 39),
                 (4.886, -32, -32, -54, .01, 90), (5.478, -33, -34, -51.5, .08, 40),
                 (5.582, -21.5, -31, -52.5, 0.074, 7.5), (5.636, -40, -31, -60, 0.015, 92),
                 (6.214, -28.5, -37.5, -52.5, 0.47, 18), (6.748, -32.5, -41.5, -61, 0.57, 36),
                 (7.6, -38.5, -52.5, -80, 0.72, 1.5)]
SWELL_RISE_S = 0.07
SEAR_DRIES = 1.21  # sear and sputter fall this many times as fast as the fizz
SIMMER_FIZZ_DB, SIMMER_SEAR_DB, SIMMER_SPUTTER_DB = -47.5, -55, -71.5  # the pan left to itself


def boil():
    """Levels in dB of fizz, sear and sputter: every swell adds its power to the simmer."""
    simmer = amp([[SIMMER_FIZZ_DB], [SIMMER_SEAR_DB], [SIMMER_SPUTTER_DB]])
    power = np.ones((3, N)) * simmer ** 2
    for s, fizz_db, sear_db, sputter_db, hold, fall in SIZZLE_SWELLS:
        oil = swell(s, SWELL_RISE_S, hold, fall)
        meat = swell(s, SWELL_RISE_S, hold, fall * SEAR_DRIES)
        power += np.array([amp(fizz_db) * oil, amp(sear_db) * meat, amp(sputter_db) * meat]) ** 2
    return 10 * np.log10(power)


def scattered(x, life):
    """Smear every impulse into its own brief puff of noise, as it bounces about the pan."""
    keep = np.exp(-1 / (life * SR))
    power = signal.lfilter([1], [1, -keep], x ** 2)
    return unit(np.sqrt(np.abs(power)) * rng.standard_normal(N))


def bubbles(count, centre_hz, scatter, cycles, spread_db):
    """A swarm of bubbles with random times, pitches, lives and sizes, at rms 1."""
    pitch, life, loud = np.clip(rng.standard_normal((count, 3)), -2, 2).T
    waves = rings(centre_hz * np.exp(scatter * pitch), cycles * np.exp(0.37 * life))
    return unit(placed(rng.random(count) * N / SR, waves * amp(spread_db * loud)[:, None]))


# colour of the sear under the patty: pitch_hz, relative_level_db
SEAR_COLOUR = [(200, -32), (900, -21.5), (1400, -4.5), (1950, -6), (2500, 0), (3100, 1.1), (4100, 2.1),
               (5200, -0.8), (7000, -4.5), (10000, -26), (16000, -26)]
# colour of the fizz in the oil film: pitch_hz, relative_level_db
FIZZ_COLOUR = [(800, -29.5), (2500, -6.5), (3900, -13), (4600, -3.5), (5400, -3), (6100, 2.5), (6500, 8),
               (7400, -10), (8300, 4), (9500, 4.5), (12500, 3), (14000, 2.5), (16000, 0)]
# colour of the low sputter: pitch_hz, relative_level_db
SPUTTER_COLOUR = [(80, -23), (200, -8), (350, -1), (520, 2.5), (720, 3.5), (950, -4), (1250, -12),
                  (1500, -22), (3000, -44)]
# oil deep enough to hold bubbles: start_s, ringing_db (against the fizz, before the crackle share)
OIL_POOL = [(1.8, -3.5), (2.2, -7.5), (4.6, -1), (5.1, 4.5), (5.45, 6), (5.7, 2), (6.6, 0.5), (7.5, -5),
            (8.8, -1.5)]
# a weak boil falls apart into snaps, a strong one merges: fizz level amid the change, its width
CRACKLE_MIDDLE_DB, CRACKLE_WIDTH_DB = -39, 4.5
CRACKLE_LEAST, CRACKLE_GROWS, CRACKLE_CAP = 0.034, 0.616, 0.9  # share of power: full boil, growth factor, limit
# pockets under the patty ring when the sear is strong: level against the sear, dB gained per dB over the fizz
TRAPPED_DB, TRAPPED_GROWS = -0.5, 0.62


def sizzle():
    """Water boils out of the meat: a dense bed of tiny bursts, with crackle and ringing bubbles on top."""
    fizz_db, sear_db, sputter_db = boil()
    strength = np.exp((fizz_db - CRACKLE_MIDDLE_DB) / CRACKLE_WIDTH_DB)
    share = np.minimum(CRACKLE_LEAST + CRACKLE_GROWS / (0.5 + strength), CRACKLE_CAP)
    crackle = np.sqrt(share)  # gain from share of power
    ring_db = fizz_db + curves(OIL_POOL)[0]
    trapped_db = sear_db + TRAPPED_DB + TRAPPED_GROWS * (sear_db - fizz_db)
    # bubbles set off their neighbours, so the level clumps
    clumps_db = crackle * (1.0 * wobble(11) + 2.3 * wobble(45) + 2.0 * wobble(260))
    # sear and fizz share these snaps: a larger burst sounds in the middle and the treble at once
    snaps = scattered(bursts(rate=360, spread_db=5.5), life=0.00033)

    def boiling():
        return np.sqrt(1 - share) * bursts(rate=14000, spread_db=6.0) + crackle * snaps

    sear = amp(sear_db + 1.0) * coloured(boiling(), SEAR_COLOUR)
    fizz = amp(fizz_db) * coloured(boiling(), FIZZ_COLOUR)
    sputter = amp(sputter_db) * coloured(bursts(rate=1500, spread_db=5.5), SPUTTER_COLOUR)
    # the smaller the bubble, the higher it rings: pinpricks, bubbles in the open oil, pockets under the patty
    pinpricks = amp(fizz_db) * crackle * bubbles(
        count=4500, centre_hz=10080, scatter=0.263, cycles=3.1, spread_db=3.0)
    ringing = amp(ring_db) * crackle * bubbles(
        count=1400, centre_hz=5620, scatter=.115, cycles=2.2, spread_db=4.0)
    ringing += amp(ring_db - 11.5) * bubbles(
        count=9000, centre_hz=5283, scatter=0.038, cycles=4.5, spread_db=-1.5)
    trapped = amp(trapped_db) * bubbles(
        count=4500, centre_hz=3770, scatter=0.17, cycles=1.75, spread_db=6.5)
    mix = sear + fizz + sputter + pinpricks + ringing + trapped
    return open_share() * amp(clumps_db - 1.0) * mix


# the two microphone ports: pitch_hz, left_lead_rad (phase by which left leads)
PORT_PHASE = [(20, -.03), (130, -.03), (500, -0.19), (1000, -0.08), (1400, -0.08), (2000, -0.02),
              (2500, 0.5), (3400, 0), (4400, 0.64), (5000, 0.2), (5700, 1.55), (7400, 3), (10300, 6),
              (13500, 9.5), (16200, 12)]
# share of the side sound that is loosened from the centre, widening the stereo: pitch_hz, power_share (0-1)
SIDE_LOOSENESS = [(800, .25), (2500, .6), (6000, 0.2), (15000, .6)]
# soft smeared treble, a quarter turn apart in centre and side: pitch_hz, level_db
SMEARED_TREBLE = [(1800, -60), (4000, -26), (7000, -23), (16000, -21)]


def scene():
    """The skillet lies off axis, so its treble reaches the two ports out of step; loose side sound widens it."""
    skillet = sizzle() + covered() + pops() + knocks() + scrapes()
    ahead, across = skillet + amp(-13.0) * room(skillet)

    def loosen(hz):
        share = np.clip(along(SIDE_LOOSENESS, hz), 0, 1)
        return np.sqrt([1 - share, share])

    def side_turn(hz):
        return 1j * np.array([np.sin(along(PORT_PHASE, hz) / 2), np.ones_like(hz)])

    loose = smeared(skillet, life=.0012)
    across = filtered(np.array([across, loose]), loosen).sum(axis=0)
    treble = filtered(smeared(skillet, life=0.00035), lambda hz: amp(along(SMEARED_TREBLE, hz)))
    mid = filtered(ahead, lambda hz: np.cos(along(PORT_PHASE, hz) / 2)) + treble
    side = filtered(np.array([across, treble]), side_turn).sum(axis=0)
    return np.array([mid + side, mid - side]) + appliance_tones() + room_noise()


# the right port favours the low middle: pitch_hz, left_minus_right_db
PORT_LEAN = [(130, 0), (250, -.9), (500, -2.4), (750, -2.2), (1200, -.2), (1900, 0)]
TOP_HZ = 15850  # band limit


def record(dry):
    """The ports differ a little in colour; nothing passes above the band limit."""
    halves = np.array([[.5], [-.5]])  # left, right
    return filtered(dry, lambda hz: amp(along(PORT_LEAN, hz) * halves) * (hz < TOP_HZ))


dry = scene()
out = record(dry)
generate_wav(out)
```